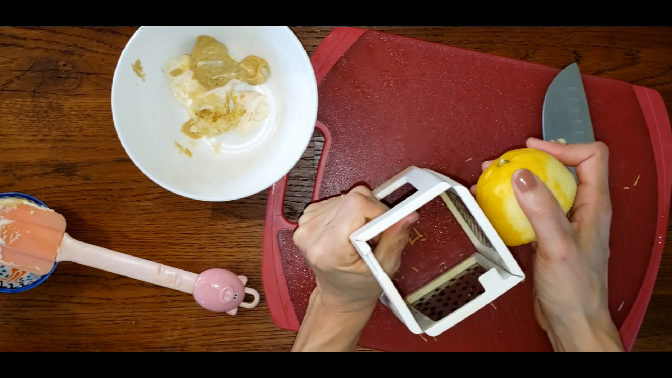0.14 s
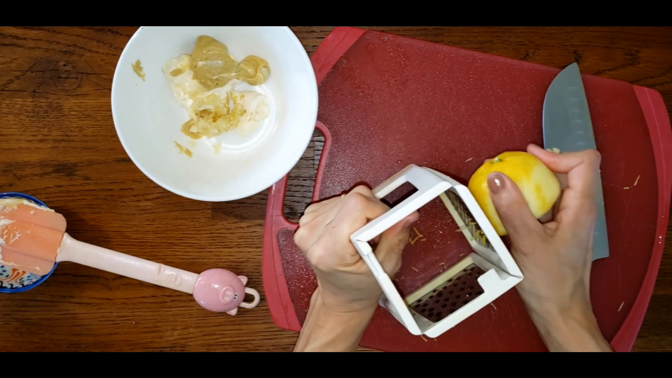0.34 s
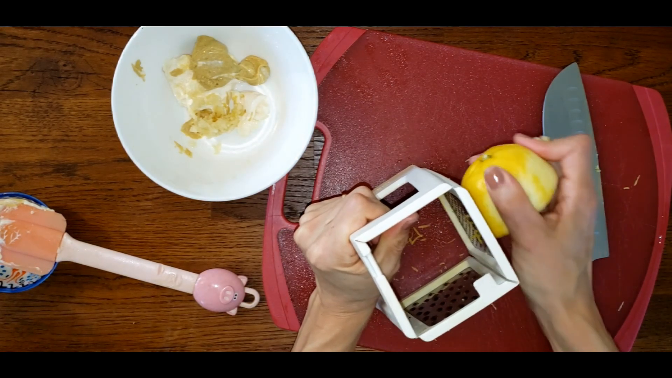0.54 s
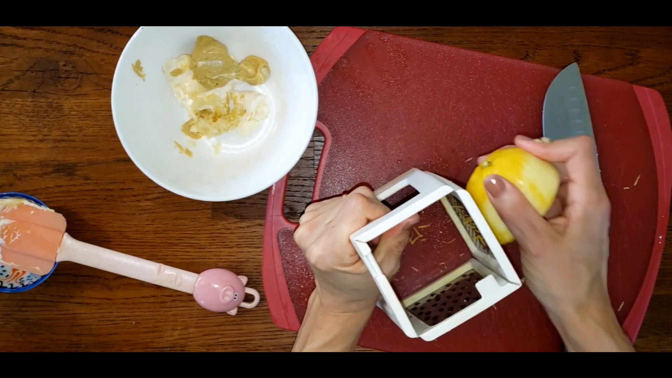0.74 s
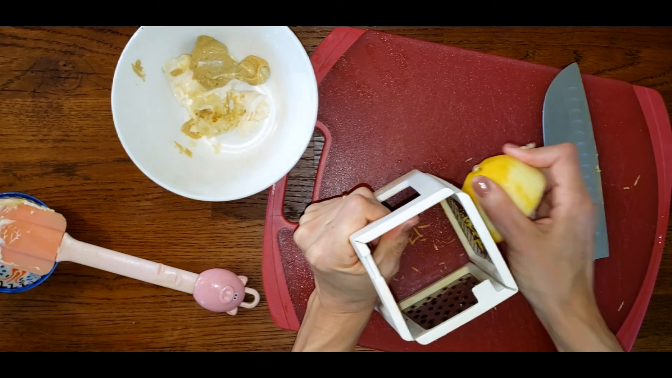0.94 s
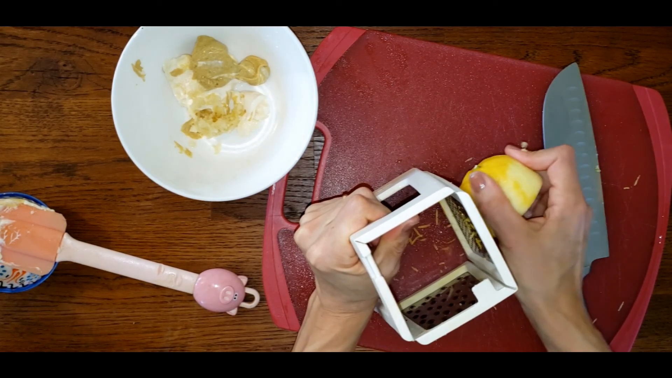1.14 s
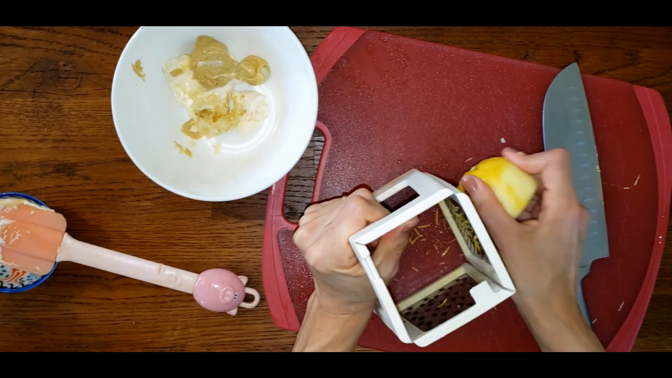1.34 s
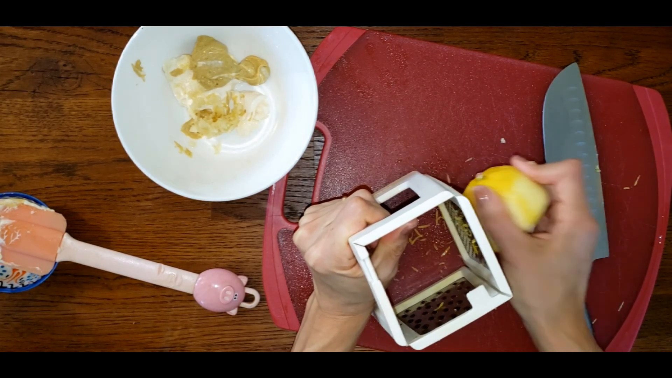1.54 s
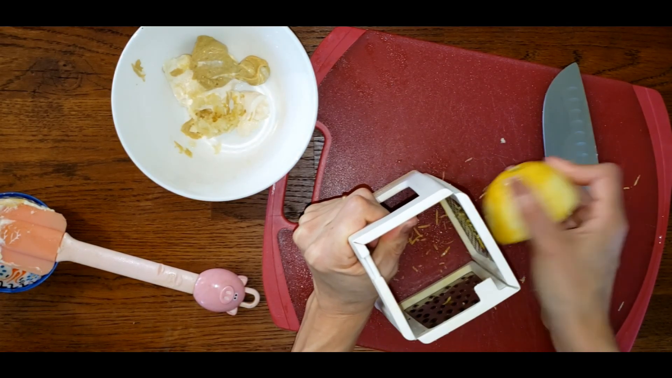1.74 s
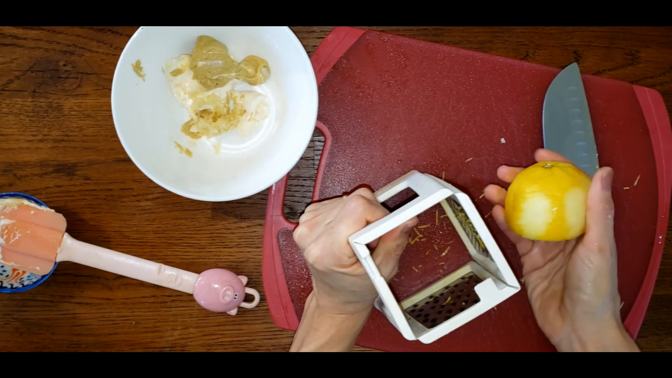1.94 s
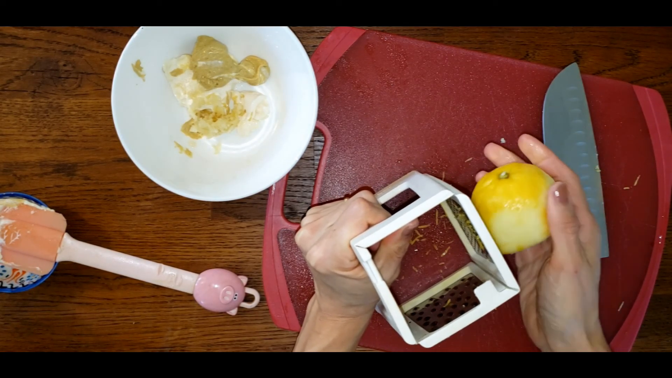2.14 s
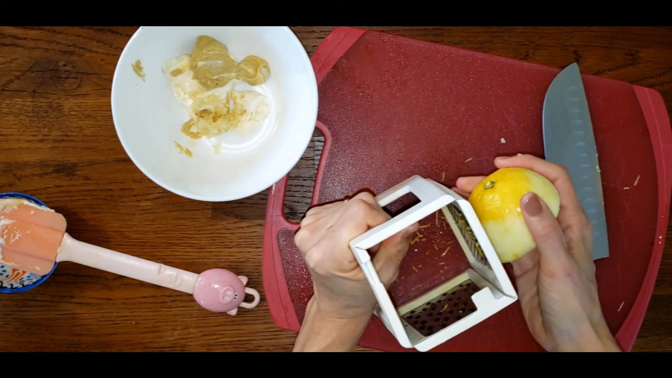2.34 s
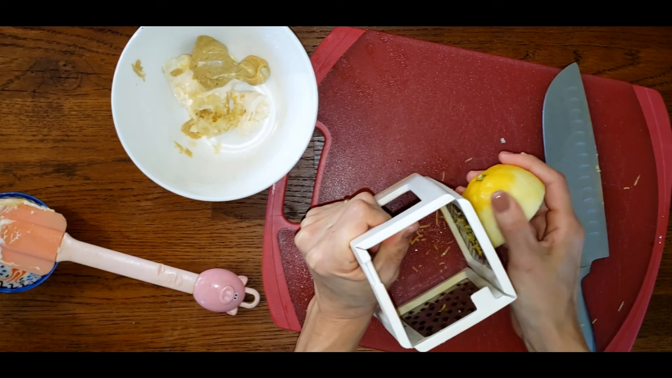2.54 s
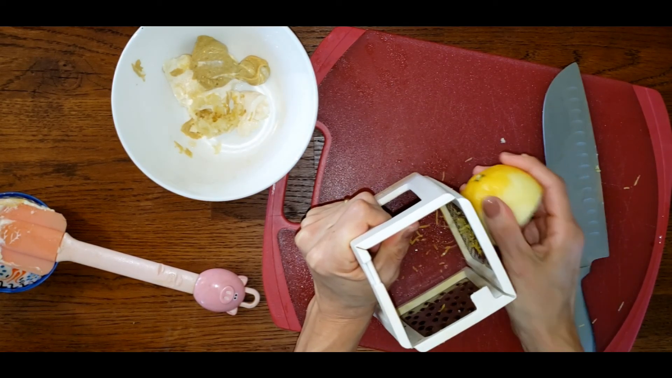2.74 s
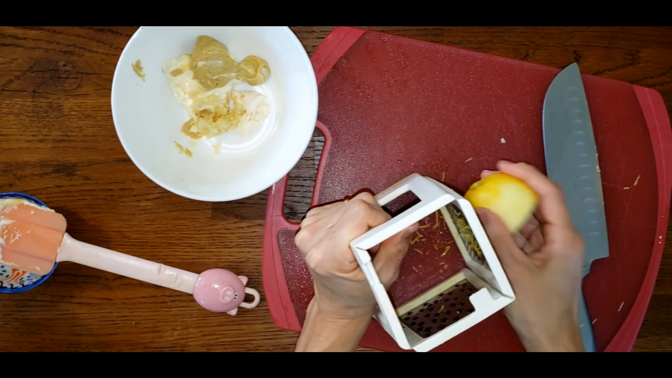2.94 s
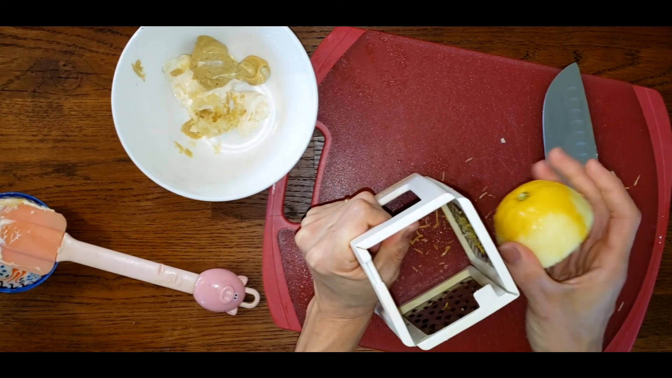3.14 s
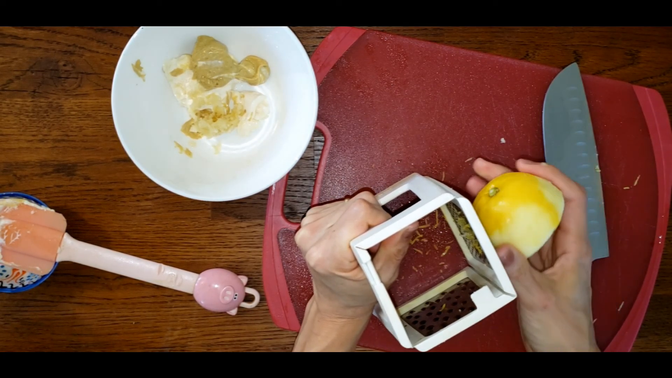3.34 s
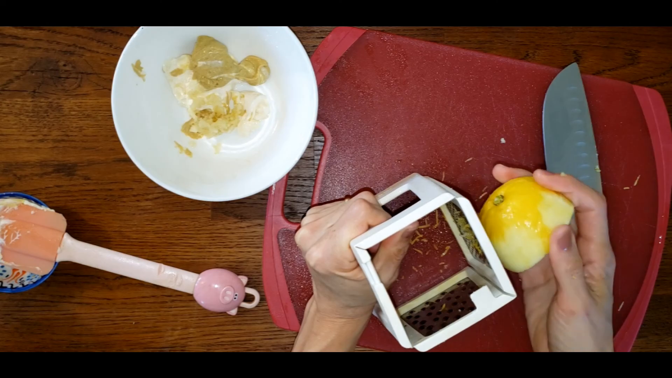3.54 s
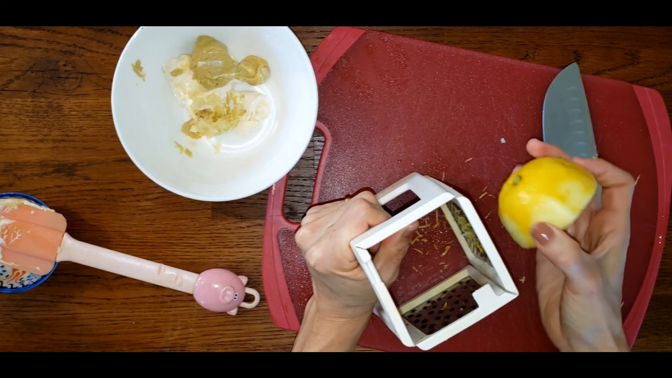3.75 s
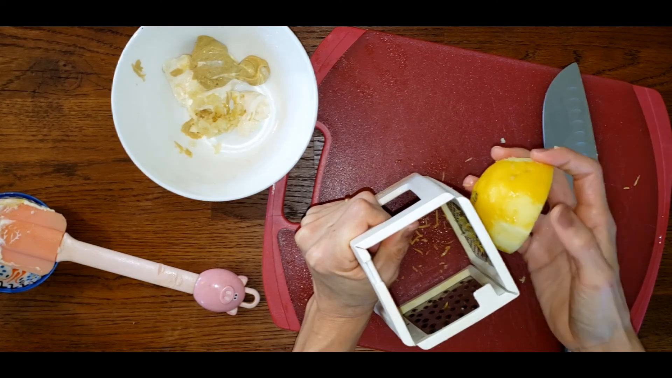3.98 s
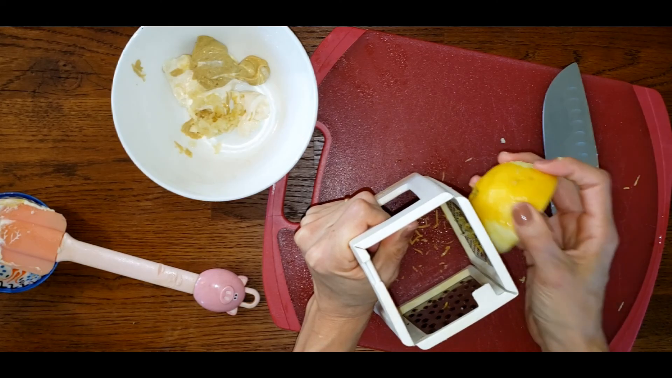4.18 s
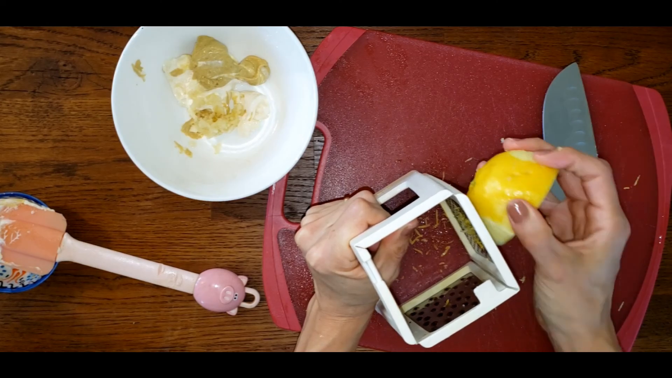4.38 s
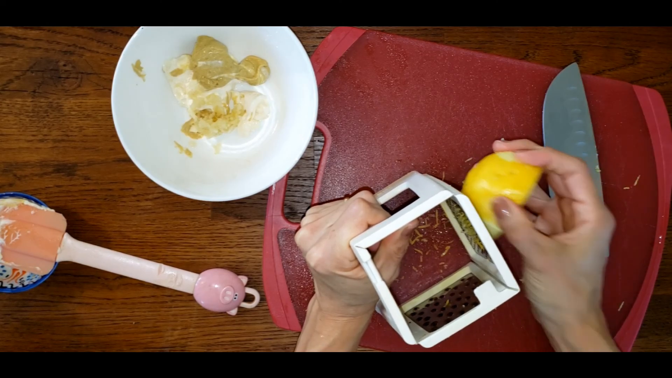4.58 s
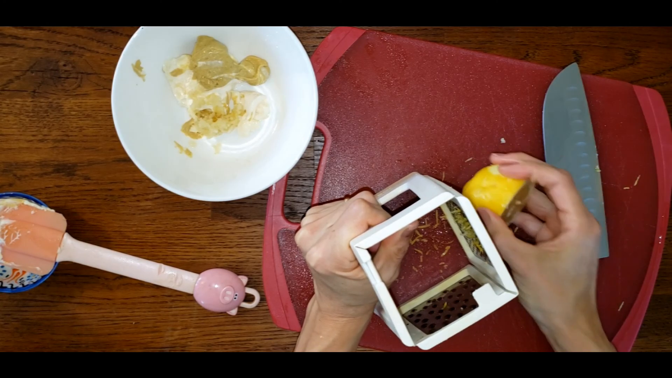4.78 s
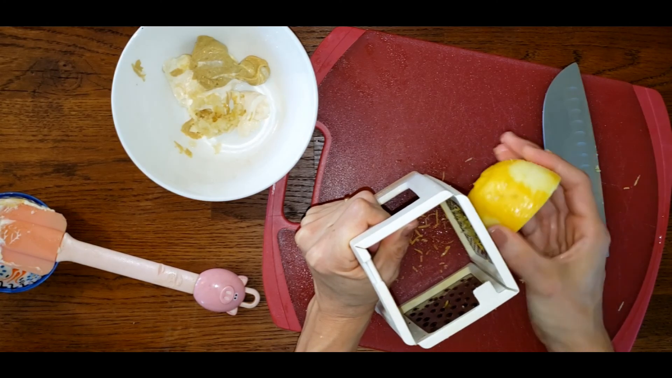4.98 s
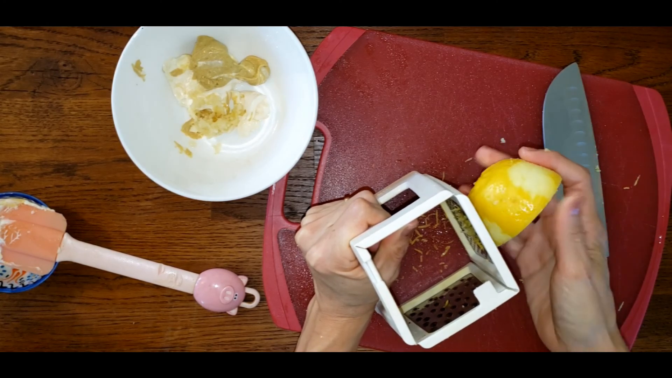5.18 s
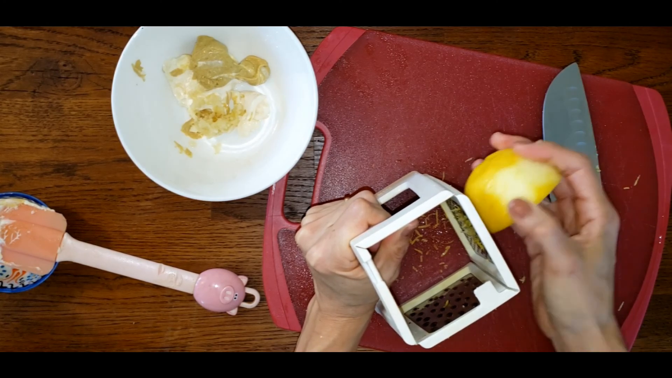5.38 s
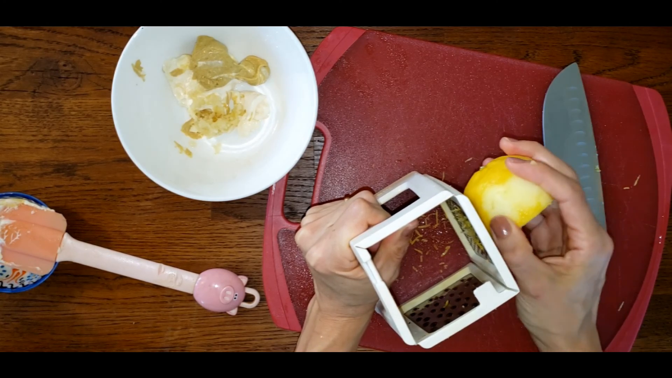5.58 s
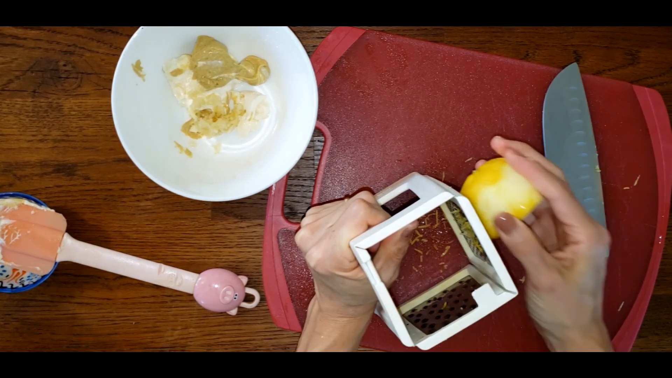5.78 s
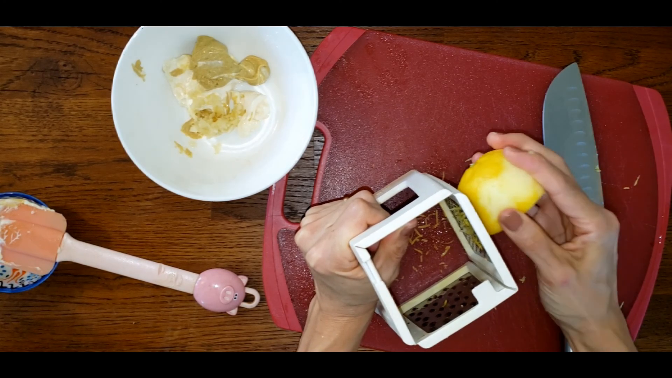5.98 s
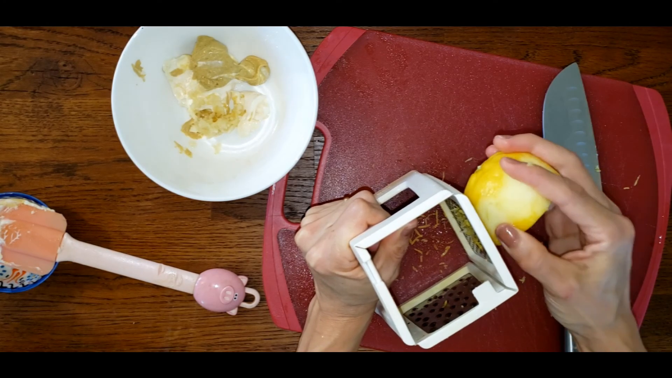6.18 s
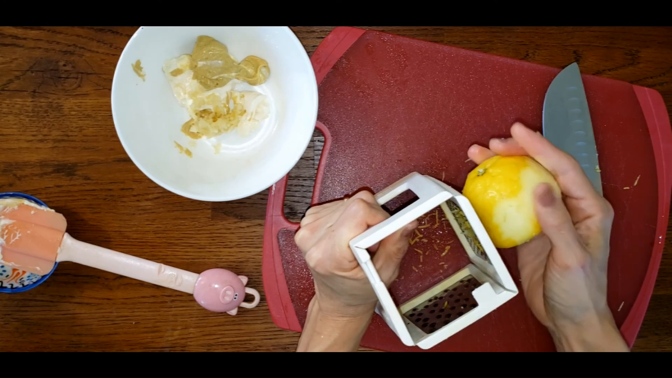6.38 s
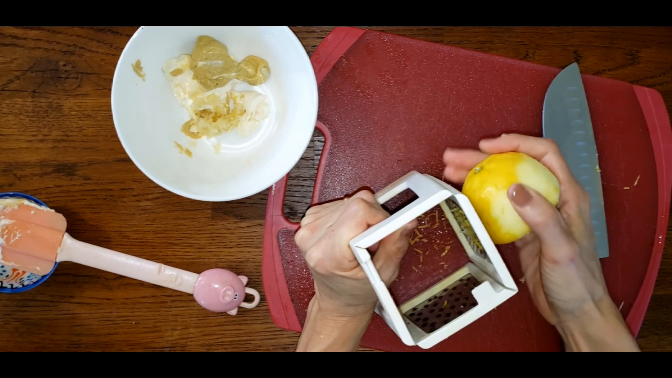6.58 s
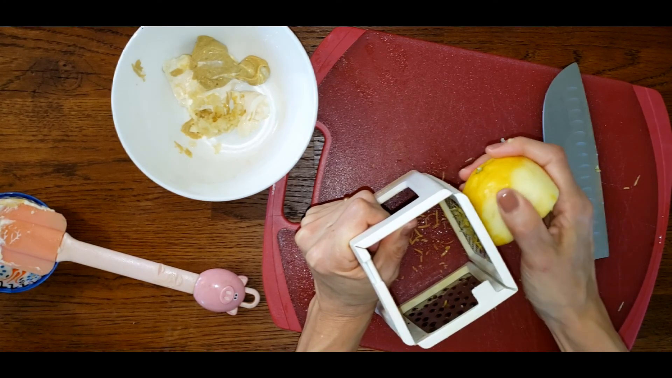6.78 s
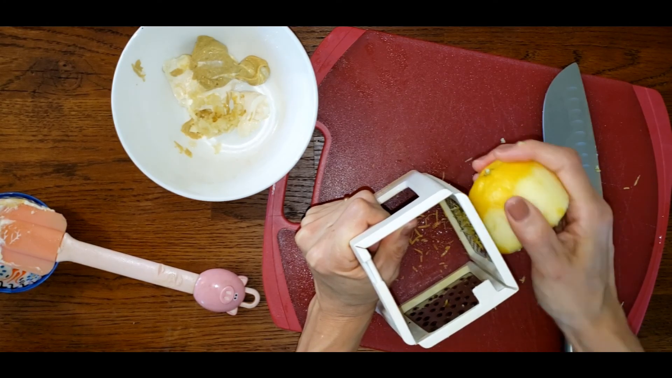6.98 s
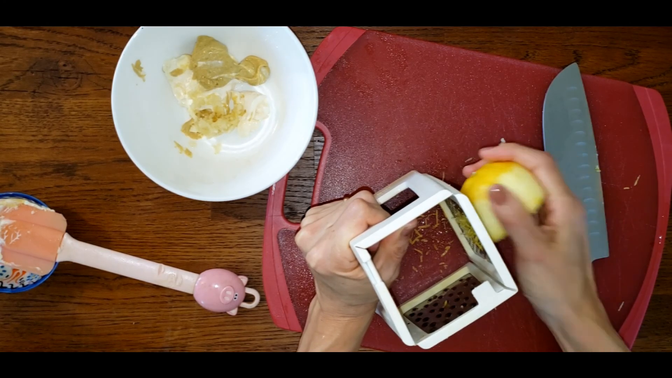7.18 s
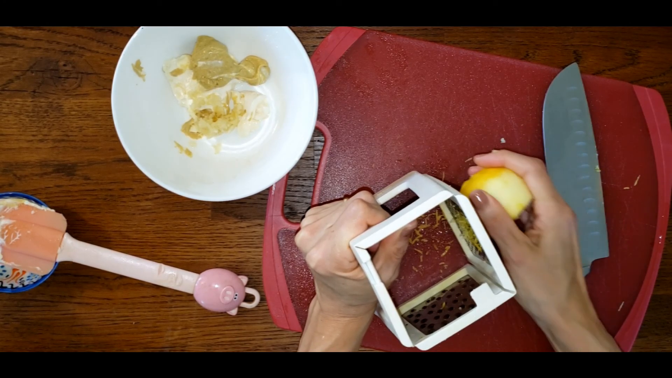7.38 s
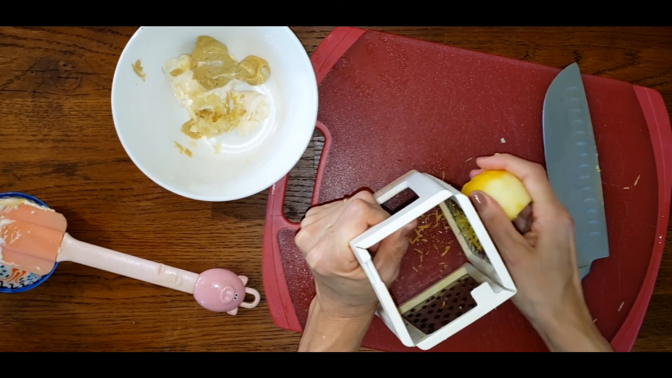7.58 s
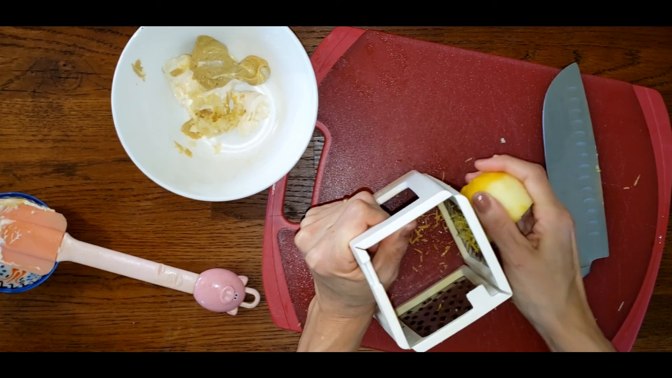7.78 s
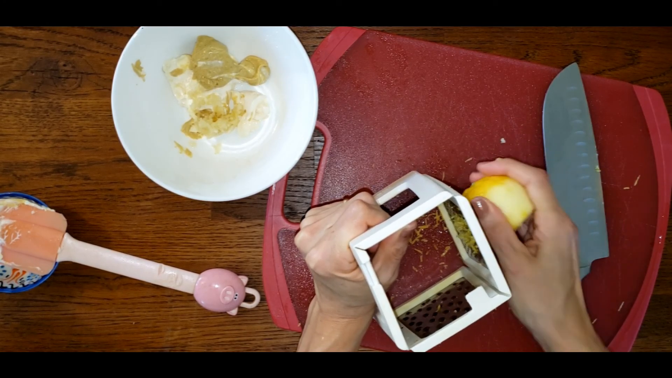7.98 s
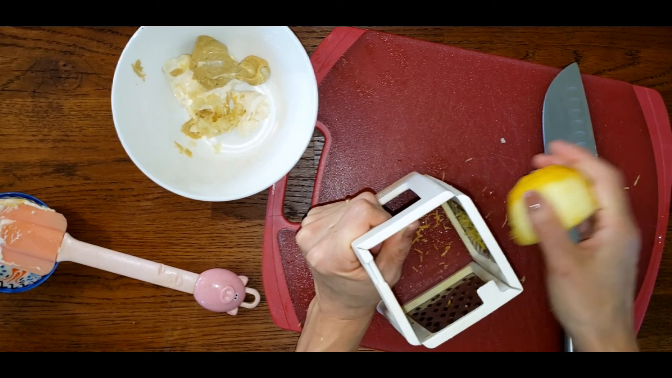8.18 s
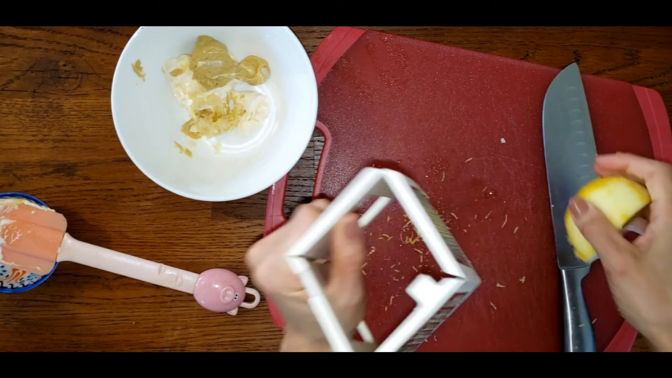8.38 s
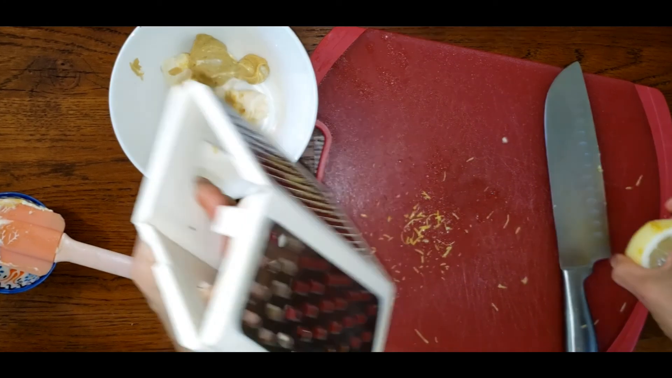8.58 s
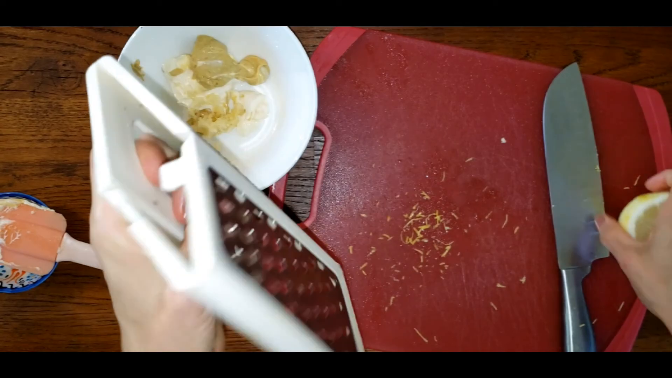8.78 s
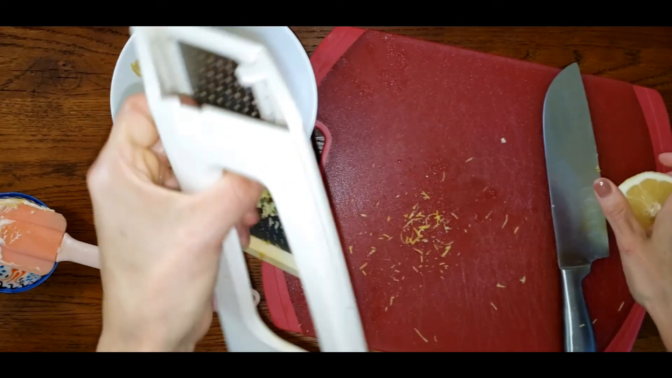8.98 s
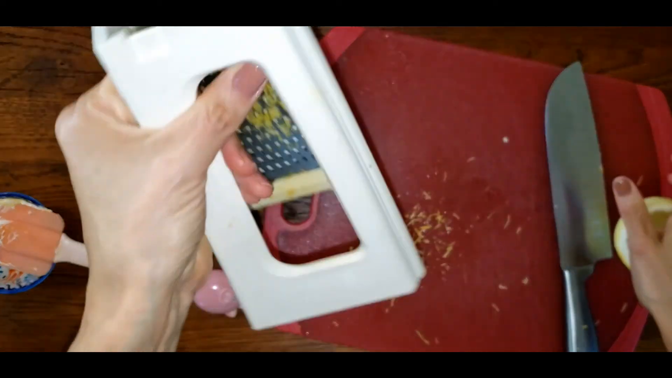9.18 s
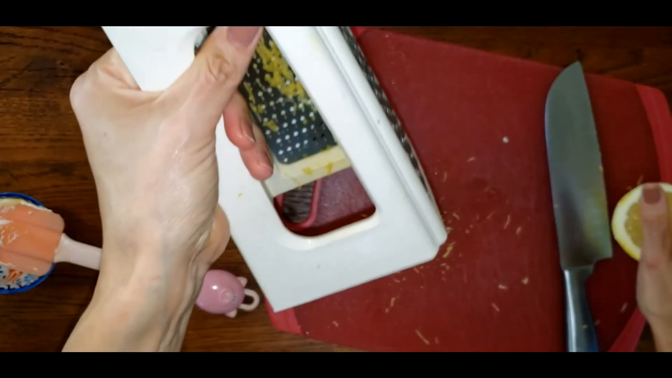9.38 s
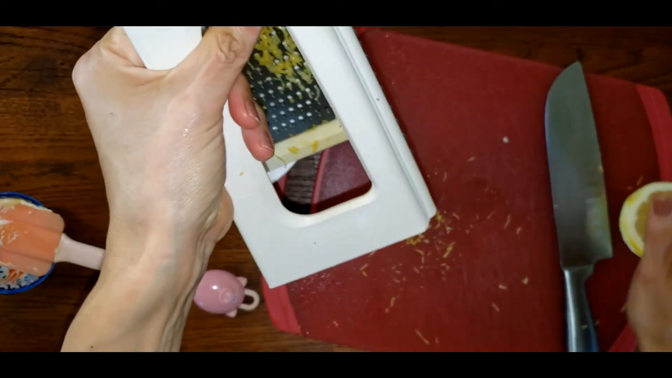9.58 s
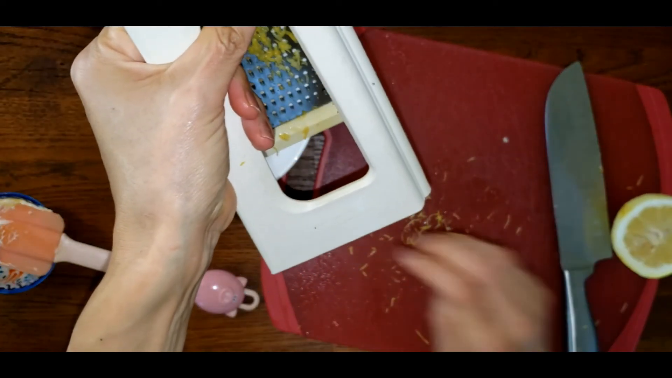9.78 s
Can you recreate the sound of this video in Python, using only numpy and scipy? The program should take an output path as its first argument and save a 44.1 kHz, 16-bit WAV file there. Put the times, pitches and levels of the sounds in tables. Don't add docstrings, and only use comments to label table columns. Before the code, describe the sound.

Quick dry scrapes of citrus peel against grater teeth come in uneven runs, each about a tenth of a second, with steel ringing and the board thudding beneath. Softer drags return between them. Pauses hold faint hand bumps, rustles and tiny squeaks. After the last run, one solid knock rattles the table, something small clinks, and quiet hum remains. Close stereo microphone, small kitchen with slight echo.

```python
import sys
import numpy as np
from scipy import signal
from scipy.fft import rfft, irfft, next_fast_len
from scipy.io import wavfile

SR = 44100
rng = np.random.default_rng(int(sys.argv[2]) if len(sys.argv) > 2 else 0)


def ratio(d):
    e = np.asarray(d, float) / 20
    return 10 ** e


def waveform_to_disk(signal):
    frames = np.transpose(np.atleast_2d(signal))
    scaled = np.clip(frames, -1, 1) * 32767
    samples = np.round(scaled).astype(np.int16)
    wavfile.write(sys.argv[1], SR, samples)


N = 433503


# pitch_hz, density_db (per Hz)
RIND_SPECTRUM = [(530, -33), (900, -8), (1160, -6), (1680, -1.5), (2070, -5.5), (3000, -8), (4740, -8.5),
                 (7490, -18.5), (8600, -11.5), (12400, 7), (16000, -5)]
# pitch_hz, left_over_right_db
RASP_SIDES = [(60, 0.5), (150, 0.0), (380, 16), (950, 0.5), (2380, 1.5), (5980, -4), (15000, -13)]


def teeth_grains():
    clicks = grains(36000, spread_db=1.5, alike=0.28) * ratio(1.2 * drift(90))
    pitches = np.geomspace(900, 15900, 32)
    share = np.sqrt(pitches) / np.sqrt(pitches).sum()
    dealt = rng.choice(32, N, p=share)
    patches = [ratio(2.5 * drift(18.4)) for group in range(16)]
    plate, edges, tear = 0, 0, 0
    for k, hz in enumerate(pitches):
        cycles = 24 if k < 23 else 12
        one = rms_one(ring(clicks * (dealt == k) * patches[k // 2], hz, cycles / hz))
        one = one * ratio(at_hz(RIND_SPECTRUM, hz)) * np.sqrt(hz) * sides(at_hz(RASP_SIDES, hz))
        if k < 13:
            plate = plate + one
        elif k < 23:
            edges = edges + one
        else:
            tear = tear + one
    return plate, edges, tear


# pitch_hz, level_db, t60_s
BOX_MODES = [(950, -32, 0.029), (1157, -6, 0.16), (1366, 1, 0.065), (1663, 0, 0.11), (1880, -13.5, 0.23),
             (2417, -8.5, 0.028)]


def box_walls(plate_db):
    shaking = grains(3000, spread_db=1.5, alike=0.48) * ratio(plate_db - 34.5)
    return sum(ratio(db) * ring(shaking, hz, t60) for hz, db, t60 in BOX_MODES)


# start_s, length_s, level_db
RUBS = [(3.1, 0.14, -52), (3.296, 0.053, -54), (2.7, 0.069, -65), (3.897, 0.071, -70), (8.4, 0.099, -49),
        (6.8, 0.061, -46), (6.326, 0.1, -55), (6.497, 0.098, -52.5), (6.598, 0.044, -57),
        (6.78, 0.17, -49.5), (2.225, 0.082, -63.5), (8.502, 0.023, -74), (9.19, 0.048, -74),
        (5.2, 0.066, -60), (8.66, 0.074, -66.5), (2.2, .03, -57), (1.2, 0.062, -53), (2.5, 0.05, -32)]
# start_s, level_db
SNAGS = [(4.761, -33), (7.101, -43), (.762, -47), (1.108, -29), (2.56, -21.5), (4.306, -25), (4.535, -27),
         (4.548, -18), (4.737, -34), (4.79, -35), (4.815, -30), (5.736, -33), (5.835, -36), (5.706, -38),
         (6.067, -37), (7.271, -35), (6.044, -25.5), (6.845, -23), (6.953, -48), (7.367, -27)]


def rubbing():
    snag_s = 0.0075
    rows = RUBS + [(s, snag_s, db) for s, db in SNAGS]
    return sum(ratio(db) * swell(s, length) for s, length, db in rows)


# peak_s, level_db
CATCHES = [(0.315, -39), (0.615, -33), (0.870, -48), (0.892, -37), (1.110, -35), (1.344, -43), (1.384, -20),
           (1.588, -40), (1.608, -29), (2.512, -58), (2.750, -51), (2.770, -23), (2.965, -31), (4.268, -53),
           (4.307, -29), (4.526, -38), (4.551, -34), (4.740, -28), (4.760, -31), (5.684, -50), (5.702, -44),
           (6.030, -35), (6.047, -24.5), (6.847, -31), (6.885, -31.5), (7.103, -36), (7.128, -27),
           (7.361, -35), (7.379, -28), (7.577, -33), (7.799, -36), (7.811, -35), (8.023, -28.5)]


def biting():
    arch = swell(0, 0.0061)[:900]
    return ratio(-14) * signal.oaconvolve(blows(CATCHES), arch)[60:N + 60]


# start_s, length_s, tearing_db, board_db, table_db
STROKES = [(0.261, 0.11, -40, -25, -22), (0.587, 0.072, -31, -20.5, -15), (0.85, 0.064, -30.5, -17, -17),
           (1.098, 0.07, -29.5, -18.5, -14), (1.34, 0.074, -25, -18, -15),
           (1.581, 0.072, -28.5, -14.5, -17), (2.487, 0.092, -34.5, -20, -19.5),
           (2.738, 0.069, -24.5, -17, -15.5), (2.949, 0.061, -26.5, -14.5, -16),
           (4.257, 0.022, -37.5, -21.5, -19), (4.293, 0.043, -31, -16, -16.5),
           (4.503, 0.086, -26, -18, -14.5), (4.738, 0.088, -26, -17, -17), (5.671, 0.072, -38, -22, -20.5),
           (6.023, 0.043, -32.5, -19.5, -15.5), (6.837, 0.025, -37.5, -17, -18.5),
           (6.877, 0.022, -29.5, -18, -16.5), (7.096, 0.082, -24, -15.5, -15.5),
           (7.345, 0.064, -24.5, -13, -12.5), (7.57, 0.063, -27.5, -16, -13.5),
           (7.788, 0.065, -27, -15, -12), (8.005, 0.073, -26.5, -14.5, -14),
           (8.842, 0.027, -55, -11.5, -17)]
# start_s, length_s, tearing_db, board_db, table_db
RETURNS = [(-.13, .22, -47.5, -24.5, -23.5), (0.736, 0.064, -50, -40, -26),
           (0.965, 0.12, -42.5, -33.5, -41), (1.208, 0.14, -48, -40.5, -43), (1.46, 0.099, -37, -27.5, -37),
           (2.605, 0.15, -53, -32, -29.5), (2.833, 0.12, -38, -27, -25.5), (4.366, 0.18, -62, -33.5, -40),
           (4.631, 0.096, -38.5, -25.5, -30), (5.78, 0.047, -55, -37, -32),
           (5.836, 0.12, -50, -33.5, -22.5), (6.964, 0.17, -61, -52, -30), (7.24, .08, -38, -30, -23),
           (7.459, 0.094, -39, -31.5, -31.5), (7.686, 0.082, -35.5, -29, -23),
           (7.895, 0.096, -38, -28.5, -30)]
# time_s, level_db
GRIP = [(0, -80), (.2, -64), (.55, -62), (1.75, -58), (1.95, -73), (2.3, -65.5), (3.2, -67), (3.6, -62.5),
        (3.8, -68), (4.2, -63), (5.0, -60), (5.3, -70.5), (5.6, -64), (6.7, -67), (8.2, -61), (8.35, -65),
        (8.5, -67), (9.8, -76.5)]
# landing_s, landing_db, peak_share of length, end_db, let_go_s, let_go_db, dying_s
TEAR_SHAPE = (-0.0049, -12, 0.66, -4, 0.022, -16, 0.31)
PLATE_SHAPE = (0.007, -13, 0.53, -3.5, 0.036, -13, 0.34)
EDGE_SHAPE = (0.006, -12, 0.55, -3, 0.024, -15, 0.3)


def teeth_levels():
    grip_db = in_time(GRIP)[0][::16]

    def mixed(board_share, offset_db):
        return [[(s, length, offset_db + board_share * board_db + (1 - board_share) * db)
                 for s, length, db, board_db, _ in rows] for rows in (STROKES, RETURNS)]

    tear_db = effort(*mixed(0, 0), TEAR_SHAPE, grip_db - 1.5, 0, softer=0.59)
    plate_db = effort(*mixed(0.5, -7.5), PLATE_SHAPE, grip_db - 2.0, 0.0026, softer=0.78)
    edge_db = effort(*mixed(0.25, -12.5), EDGE_SHAPE, grip_db - 10.0, 0.00051, softer=1.0)
    pause_db = lift_db(ease_s=0.012)
    return tear_db + pause_db, plate_db + pause_db, edge_db + lift_db(ease_s=0.018)


def rasp():
    tear_db, plate_db, edge_db = teeth_levels()
    plate, edges, tear = teeth_grains()
    tear = filtered(tear, 4, 7600, "high")
    tear = rms_one(tear + ratio(-6.0) * filtered(tear, 2, [11500, 14000], "band"))
    bites = biting()
    body = (ratio(plate_db) + ratio(-9.5) * bites) * rms_one(plate) + box_walls(plate_db)
    cutting = (ratio(edge_db + 2.07) + ratio(-7.0) * bites) * rms_one(edges)
    return (ratio(tear_db + 2.5) + rubbing()) * tear + cutting + filtered(body, 4, 3100, "low")


# start_s, length_s, board_db, table_db
NUDGES = [(2.198, 0.046, -52, -30.5), (2.484, 0.038, -36, -46.5), (3.297, 0.074, -33, -21),
          (3.588, 0.11, -34, -35), (3.938, 0.059, -33, -23), (4.213, 0.054, -31, -26),
          (5.477, 0.11, -30.5, -25), (6.15, 0.15, -38, -33.5), (6.477, 0.045, -43, -31),
          (9.298, 0.13, -46.5, -38), (0.1, 0.11, -42, -32.5), (6.779, 0.074, -42, -30),
          (8.096, 0.027, -35, -33), (8.291, 0.048, -24.5, -26.5)]
BOARD_SHAPE = (-0.0351, -17, 0.9878, -1.5, 0.0347, -14, 0.01)
TABLE_SHAPE = (-0.0452, -16, 1.04, -1, 0.0677, -17, 0.3)
FEET_SHAPE = (-0.04, -6, 0.79, 4, -0.0037, -11, 0.22)
REST_DB = -52


def wood_levels():
    def column(rows, k):
        return [(r[0], r[1], r[k]) for r in rows]

    ups = RETURNS + NUDGES
    board_db = effort(column(STROKES, -2), column(ups, -2), BOARD_SHAPE, REST_DB, lead_s=0.01)
    boom_db = effort(column(STROKES, -1), column(ups, -1), TABLE_SHAPE, REST_DB, lead_s=0.01)
    feet_db = effort(column(STROKES, 3), column(RETURNS, 3), FEET_SHAPE, REST_DB - 11.0, lead_s=-0.0032)
    ease_db = 0.1 * lift_db(ease_s=0.022)
    return board_db + ease_db, boom_db + ease_db, feet_db


# pitch_hz, level_db, t60_s, left_over_right_db, left_lag_rad
TABLE_MODES = [(77, -15, 0.069, -48, -7), (94.3, 3, 0.35, 4, -0.26), (122.1, 2.5, 0.21, -6.5, 0.18),
               (150.8, -8, 0.27, 0, 1), (203.9, -11.5, 0.36, 13.5, -1), (226.8, 0.5, 0.21, 6, 0.45),
               (288.1, -11, 0.29, 3.5, 0.15), (316.8, -1, 0.16, 6, 0.9), (337, -16, 0.37, -2.5, 0.5),
               (363.3, -15.5, 0.45, 6.5, -1)]
# pitch_hz, level_db, t60_s, left_over_right_db, left_lag_rad
FEET_MODES = [(410.7, -17.5, 0.36, 8.5, 0.26), (468.4, -15, 0.16, -5.5, -0.018),
              (485.5, -11.5, 0.072, 6, -0.16), (548, -7, 0.051, -1, -0.77), (605, -6.5, 0.087, 8, -0.32),
              (694, -6, 0.085, 2, -0.62), (737, -14.5, 0.047, 4, 0.97), (808, -37, 0.026, -2, 0.83)]
# start_s, level_db, hardness_hz
THUMPS = [
    (0.106, -33.5, 1000),
    (2.21, -44, 500),
    (3.3, -46, 600),
    (3.338, -38, 500),
    (3.934, -31.5, 450),
    (5.49, -55, 600),
    (6.489, -49, 500),
    (8.293, -28.5, 790),
    (9.401, -48, 500),
]
# peak_s, level_db
JOLTS = [(0.105, -28), (0.265, -32), (0.317, -26), (0.355, -23), (0.625, -28), (0.866, -22), (0.894, -17),
         (1.108, -22), (1.135, -19), (1.349, -34), (1.404, -8.5), (1.595, -35), (1.621, -13), (2.488, -26),
         (2.51, -28), (2.536, -16), (2.745, -35), (2.788, -21), (2.872, -26), (2.962, -21), (4.272, -15),
         (4.314, -14), (4.52, -16), (4.544, -11.5), (4.59, -14.5), (4.752, -30), (5.511, -35),
         (5.675, -22.5), (5.696, -23), (6.025, -24), (6.05, -21), (6.843, -19), (7.112, -12.5),
         (7.261, -31), (7.352, -31), (7.368, -19), (7.588, -18), (7.617, -22), (7.716, -35), (7.794, -18),
         (7.819, -18), (8.0, -24.5), (8.027, -18), (8.056, -18)]
# start_s, level_db
KNOCK = [
    (8.841, -28.5),
    (8.848, -13),
    (8.853, -8.5),
    (8.864, -18.5),
    (8.875, -25.5),
]


def wood():
    board_db, boom_db, feet_db = wood_levels()
    jolts = ratio(-7.0) * soft(blows(JOLTS), 1500)
    judder = grains(1500, spread_db=0.0, alike=0.99)
    thumps = sum(soft(soft(blows([row]), row[2]), 1500) for row in THUMPS)
    blow = ratio(-10.5) * blows(KNOCK)
    out = 0
    for hz, db, t60, left_db, lag in TABLE_MODES + FEET_MODES:
        force = ratio(boom_db - 32.5) if hz < 170 else ratio(board_db - 29.0)
        if hz > 400:
            force = ratio(-7.5) * force + ratio(feet_db - 35.5)
        strike = judder * ratio(2.1 * drift(31.0)) * force + blow
        strike = strike + thumps * ratio(-10.0 if hz < 250 else 2.0)
        strike = strike + jolts * ratio(-17.0 if hz < 400 else 0.1)
        out = out + ratio(db) * ring_pair(strike, hz, 0.82 * t60, left_db, lag)
    return filtered(filtered(out, 5, 830, "low"), 3, 68, "high")


# pitch_hz, level_db, t60_s
KNOCKED_MODES = [(93.4, -26, 0.2), (246, -5.5, 0.18), (312, 0, 0.11), (349, -13.5, 0.156),
                 (454, -15.5, 0.097), (631, -10, 0.15), (702, -13, 0.1), (715, -19, 0.25)]
# pitch_hz, level_db, t60_s
CUTLERY_MODES = [(1970, -41, 0.24), (2170, -50, 0.28), (2640, -38, 0.1), (3330, -32.5, 0.0674),
                 (3623, -45, 0.27), (4350, -25.5, 0.17), (4465, -32.5, 0.29), (5080, -33, 0.26),
                 (6200, -42, 0.14), (6700, -51, 0.093), (7320, -53, 0.15), (5150, -36, 0.102),
                 (4440, -40, .1)]


def knock():
    hit = blows(KNOCK)
    burst = dying(hit, 0.06)
    rattle = hit + ratio(-21.0) * burst * rng.standard_normal((2, N))
    struck = KNOCKED_MODES + CUTLERY_MODES
    lean = rng.normal(0, 1, (len(struck), 2))
    modes = 0
    for (hz, db, t60), (left, lag) in zip(struck, lean):
        modes = modes + ratio(db) * ring_pair(rattle, hz, t60, 1.9 + 1.8 * left, 0.059 + 0.41 * lag)
    crash = dying(hit, 0.4)
    crack = soft(soft(rng.standard_normal((2, N)), 3100), 3030) * (burst + ratio(-12.0) * crash)
    return filtered(modes + ratio(-10.0) * crack, 2, 70, "high")


def clink():
    shiver = dying(blows([(9.071, -44.5), (9.11, -58)]), 0.35)
    return filtered(rng.standard_normal((2, N)) * shiver, 2, [1700, 3300], "band") * sides(3.0)


# start_s,
# level_db, pitch_hz
TICKS = [(3.3, -48, 11000), (3.455, -49, 12000), (3.585, -33, 11500), (3.618, -37, 11500),
         (4.135, -54, 12100), (5.08, -64, 11000), (5.33, -52, 12000), (5.483, -54, 12000),
         (5.525, -40, 11400), (7.275, -19, 12500), (7.282, -24, 11000), (8.706, -46, 3980),
         (9.071, -22.5, 2030), (9.197, -36, 1950), (9.217, -39, 1920), (9.078, -38, 2290),
         (9.091, -30, 2070), (9.104, -43, 2500), (9.069, -47, 3800), (9.071, -39, 2880), (9.07, -33, 950)]
# start_s, length_s, pitch_hz, level_db
SQUEAKS = [(3.215, 0.027, 9220, -68), (3.425, 0.034, 15150, -56), (3.418, 0.033, 9300, -70),
           (3.54, 0.023, 5620, -73), (3.583, .04, 5540, -71), (9.277, 0.067, 9400, -79),
           (4.0, 0.32, 2800, -81), (4.995, 0.04, 9250, -71), (5.95, 0.045, 9250, -71),
           (5.958, .05, 5640, -75), (5.96, .04, 12300, -67), (5.96, 0.036, 15400, -70),
           (6.507, 0.045, 5540, -76), (6.55, 0.021, 8500, -64), (9.184, 0.048, 1950, -53)]
# start_s, level_db, pitch_hz, t60_s
CHIRPS = [(3.545, -67, 5700, .03), (3.583, -63, 5600, .03), (3.584, -55, 12000, .03),
          (3.632, -60, 8000, .02), (3.25, -66, 15300, 0.042), (8.665, -63, 12400, .05),
          (8.665, -68, 10500, .03), (8.515, -72, 9200, .04), (8.675, -68, 6000, 0.018),
          (8.69, -66, 5600, .015), (8.705, -66, 5660, .015), (9.285, -70, 12400, .06),
          (9.365, -68, 12500, .06), (8.85, -50, 10400, .12), (8.85, -52, 11700, .12), (8.85, -56, 9100, .1),
          (8.85, -50, 13030, 0.091)]


def fingers():
    out = np.zeros(N)
    for s, db, hz in TICKS:
        once = ring(blows([(s, db)]), hz, 10.0 / hz)
        out += ring(once, hz, 10.0 / hz) * hz / SR
    for s, length, hz, db in SQUEAKS:
        t60 = 0.007 if 5000 < hz < 6000 else 0.039
        out += ratio(db) * swell(s, length) * rms_one(ring(rng.standard_normal(N), hz, t60))
    for s, db, hz, t60 in CHIRPS:
        out += ring(blows([(s, db)]), hz, t60)
    return out * sides(-20.5)


def kitchen(x):
    t60_s, wall_cut_hz = 0.38, 10000
    size = next_fast_len(N + SR)
    turn = np.exp(-2j * np.pi * np.arange(size // 2 + 1) / size)
    dull = np.exp(-2 * np.pi * wall_cut_hz / SR)
    wall = (1 - dull) / (1 - dull * turn)
    echo = np.zeros((2, len(turn)), complex)
    for k, lag in enumerate((rng.uniform(0.008, 0.03, 16) * SR).astype(int)):
        loop = ratio(-60 * lag / SR / t60_s) * np.sqrt(np.abs(wall)) * turn ** lag
        echo[k % 2] += (-1) ** (k // 2) * loop / (1 - loop)
    return irfft(rfft(x, size) * echo, size)[:, :N]


# time_s, level_db
RUMBLE = [(0, -47), (.5, -60), (1.2, -55), (2.3, -66), (3.0, -51), (4.05, -41.5), (4.6, -45), (6.0, -41),
          (6.6, -51.5), (7.5, -48), (8.7, -62), (8.9, -38), (9.2, -50), (9.83, -61)]


def stand_rumble(white):
    rumble_db = in_time(RUMBLE)[0]
    low = filtered(white[1, 0] + 0.46 * white[0], 2, [30, 62], "band")
    return ratio(rumble_db) * rms_one(low) * sides(1.6)


# pitch_hz, density_db (per Hz)
HUM_SPECTRUM = [(25, -34), (59, 3.5), (94, 2.5), (263, -8.5), (476, -6), (641, -19), (734, -35), (818, -10),
                (1260, -29.5), (1890, -14.5), (2990, -55), (4300, -44), (7510, -58), (12500, -53),
                (16000, -34)]
# pitch_hz, likeness
HUM_ALIKE = [(60, 0.82), (240, 1), (950, 0.088), (3770, -0.49), (15000, -1.1)]


def hum():
    out, edges = 0, 25 * 2 ** np.arange(0, 9.4, 1 / 3)
    white = rng.standard_normal((2, 2, N))
    for k, (low, high) in enumerate(zip(edges, edges[1:])):
        mid, side = filtered(white[k % 2], 2, [low, high], "band")
        hz = np.sqrt(low * high)
        alike = np.clip(at_hz(HUM_ALIKE, hz), -1, 1)
        gain = ratio(at_hz(HUM_SPECTRUM, hz) + 1.3 * drift(13))
        if 1200 < hz < 2600:
            mid, side = filtered([mid, side], 10, 2200, "low")
        out = out + gain * (np.sqrt(1 + alike) * mid + np.sqrt(1 - alike) * side * [[1], [-1]])
    fan = (ratio(-61.0) + ratio(-47.5) * swell(5.08, 0.23)) * rms_one(ring(white[0, 0], 738, 0.26))
    return ratio(-43) * rms_one(out) + fan + stand_rumble(white)


RISE_S = 0.001


def lift_db(ease_s):
    t = np.arange(0, N, 16) / SR
    dip = 0
    for s, *_ in STROKES:
        dip = dip - 2.5 * np.exp(np.minimum(t - s + RISE_S, 0) / ease_s) * (t < s - RISE_S)
    return np.repeat(dip, 16)[:N]


LANDING_DB = [-1, -7, -9, -2, -2, 3, -11, -5.5, 3, -3, 2, -14, -2, -6, -7, 1, 1.5, -8, -6.5, 1.5, -7, 0,
              0.5]


def effort(strokes, drags, shape, rest_db, lead_s, softer=0):
    t = np.arange(0, N, 16) / SR + lead_s
    land_s, rule_db, share, end_db, go_s, go_db, die_s = shape
    power = ratio(rest_db) ** 2
    for (s, length, db), extra_db in zip(strokes, LANDING_DB):
        land_db = min(rule_db + softer * extra_db, 0)
        half_s = share * length / 2
        times = np.cumsum([s - RISE_S, max(land_s, 0.006), half_s, half_s, abs(1 - share) * length, go_s, die_s])
        levels = [-32, land_db, 0.35 * land_db, 0, end_db, go_db, -60]
        power = power + ratio(db + np.interp(t, times, levels, left=-90)) ** 2
    fade_s, edge_db = 0.05, -14
    for s, length, db in drags:
        times = np.cumsum([s - fade_s, fade_s, length / 2, length / 2, fade_s])
        power = power + ratio(db + np.interp(t, times, [-50, edge_db, 0, edge_db, -50])) ** 2
    return np.interp(np.arange(N), np.arange(0, N, 16), 10 * np.log10(power))


def grains(per_s, spread_db, alike):
    sizes = ratio(spread_db * np.minimum(rng.exponential(1, (3, N)), 5)) * rng.choice([-1, 1], (3, N))
    shared, left, right = sizes * (rng.random((3, N)) < per_s / SR)
    alike = np.clip(alike, 0, 1)
    both = np.array([np.roll(shared, 6), shared])
    return rms_one(np.sqrt(alike) * both + np.sqrt(1 - alike) * np.array([left, right]))


def blows(rows):
    clicks = np.zeros(N)
    for row in rows:
        clicks[round(row[0] * SR)] = ratio(row[1])
    return clicks


def ring(clicks, hz, t60, lag=0.0):
    r, w = ratio(-60 / (t60 * SR)), 2 * np.pi * hz / SR
    return signal.lfilter([-np.sin(lag), r * np.sin(w + lag)], [1, -2 * r * np.cos(w), r * r], clicks + 1e-18)


def ring_pair(clicks, hz, t60, left_db, lag):
    left, right = ring(clicks[0], hz, t60, lag / 2), ring(clicks[1], hz, t60, -lag / 2)
    return sides(left_db) * np.array([left, right])


def dying(clicks, t60):
    return signal.lfilter([1], [1, -ratio(-60 / (t60 * SR))], clicks)


def swell(s, length):
    out, start = np.full(N, 1e-9), round(s * SR)
    arch = np.sin(np.pi * np.arange(round(length * SR)) / (length * SR))
    out[start:start + len(arch)] += arch
    return out


def soft(x, hz):
    r = np.exp(-2 * np.pi * hz / SR)
    return signal.lfilter([1 - r], [1, -r], x)


def filtered(x, order, hz, kind):
    return signal.sosfilt(signal.butter(order, hz, kind, fs=SR, output="sos"), x)


def drift(rate):
    r = np.exp(-40 * np.pi * rate / SR)
    slow = signal.lfilter([1], [1, -2 * r, r * r], rng.standard_normal(N // 20 + 2002))[2000:]
    return np.interp(np.arange(N) / 20, np.arange(len(slow)), rms_one(slow))


def sides(db):
    return ratio(np.array([[db / 2], [-db / 2]]))


def rms_one(x):
    return x / np.sqrt(np.mean(x ** 2) + 1e-20)


def in_time(rows):
    s, *columns = np.transpose(rows)
    return [np.interp(np.arange(N) / SR, s, c) for c in columns]


def at_hz(points, hz):
    points = np.array(points)
    return np.interp(np.log(hz), np.log(points[:, 0]), points[:, 1])


def scene():
    near = rasp() + knock() + fingers() + clink()
    low = wood()
    return near + low + kitchen(ratio(-19) * near + ratio(-26.0) * low) + hum()


def roll_off(x):
    return signal.sosfilt(signal.butter(12, 15900, fs=SR, output="sos"), x)


def record(dry):
    rounded = 1.23 * np.tanh(dry / 1.175)
    top_cut = signal.ellip(12, 0.5, 90, 15800, fs=SR, output="sos")
    mix = signal.sosfilt(top_cut, rounded)
    return roll_off(mix)


dry = scene()
out = record(dry)
waveform_to_disk(out)
```